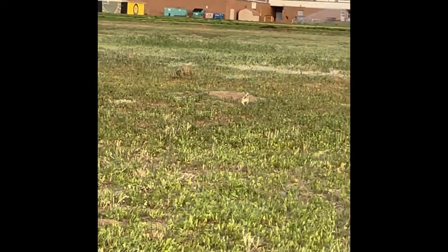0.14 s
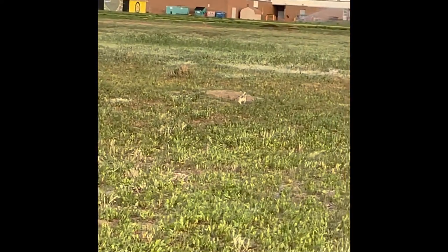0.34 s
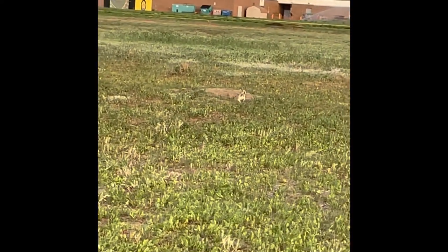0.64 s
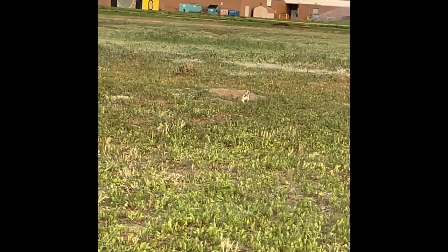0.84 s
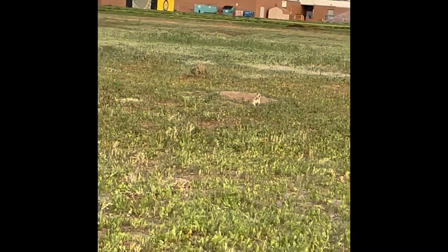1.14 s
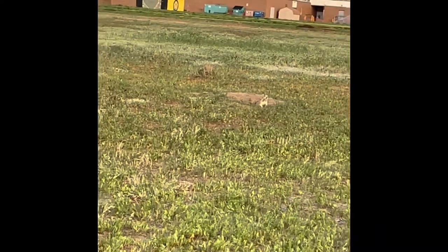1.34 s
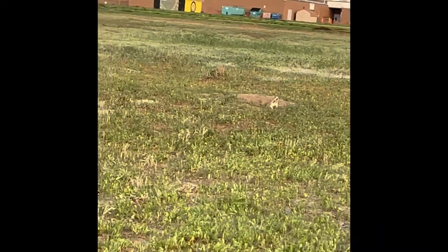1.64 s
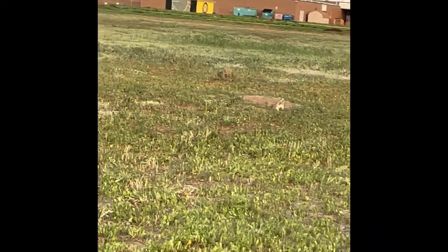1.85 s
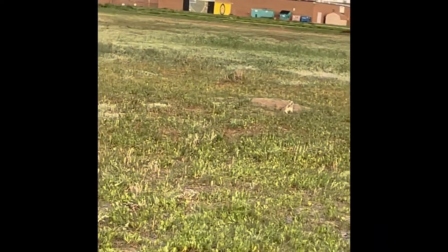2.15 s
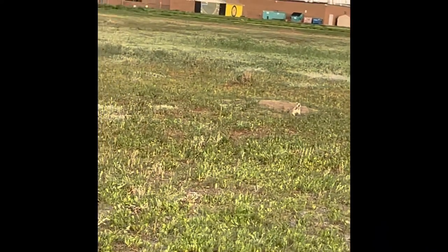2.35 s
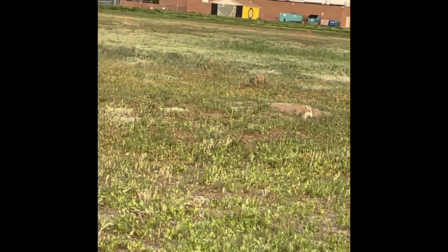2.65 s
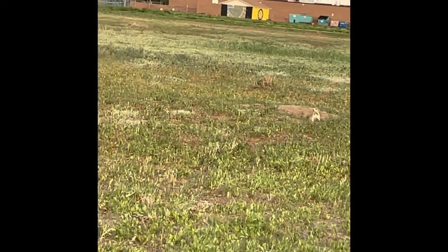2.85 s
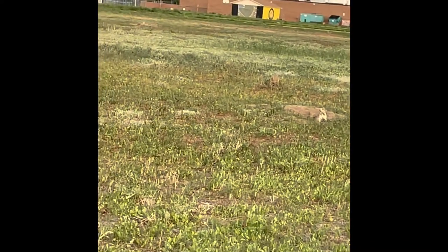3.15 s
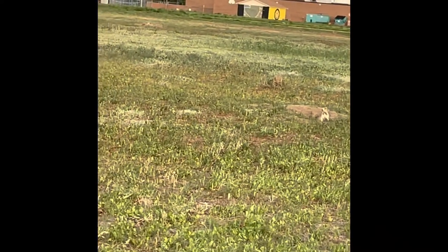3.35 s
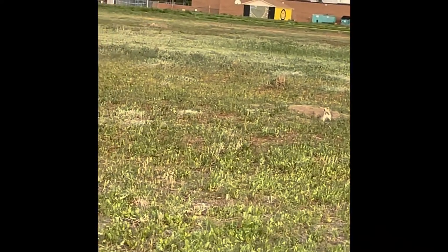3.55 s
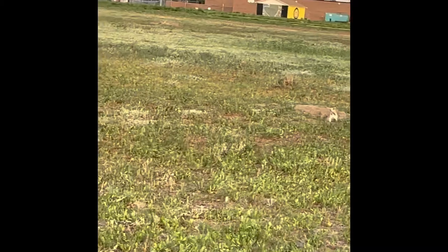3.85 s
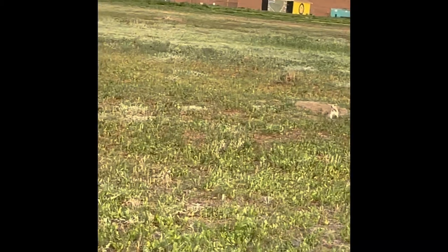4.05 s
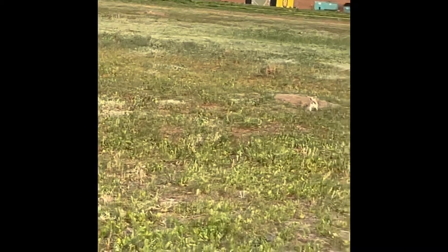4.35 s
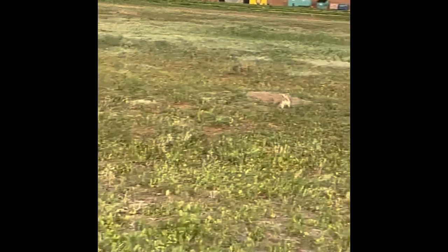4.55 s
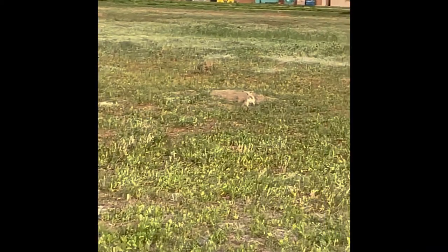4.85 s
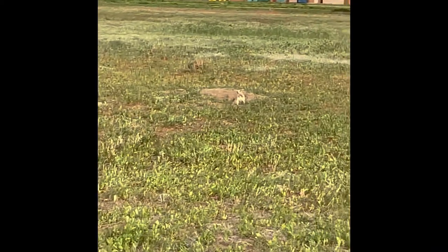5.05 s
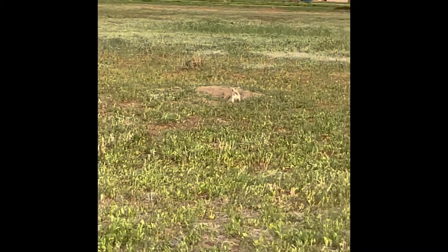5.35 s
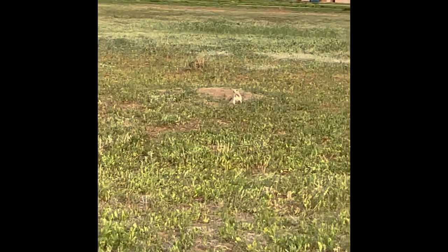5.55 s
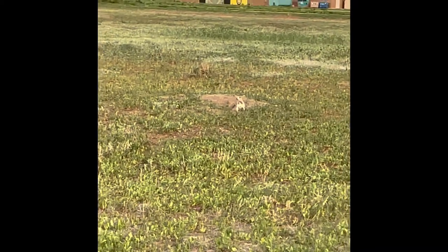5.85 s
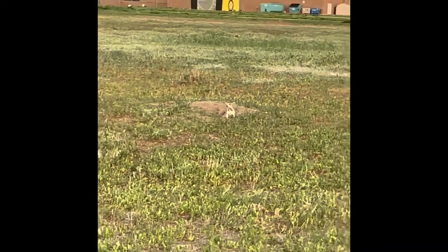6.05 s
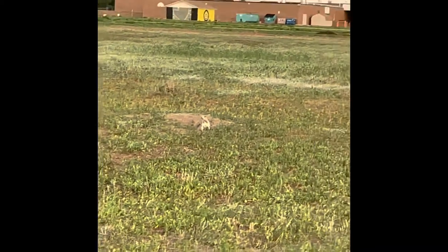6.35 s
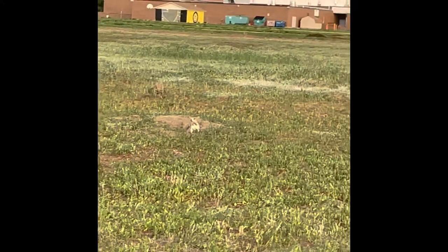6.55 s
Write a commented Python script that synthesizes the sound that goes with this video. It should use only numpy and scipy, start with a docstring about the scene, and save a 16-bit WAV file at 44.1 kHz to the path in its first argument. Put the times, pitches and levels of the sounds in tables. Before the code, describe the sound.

For about 6.7 seconds, a prairie dog colony gives alarm calls in an open field. From 0.07 s the nearest animal makes a hard, rough yip every half second or so, each under a tenth of a second and sagging into a weak, sputtering creak; these creaks sink lower after 5.2 s. A second animal barks from 0.2 s, about every third of a second, short and slightly harsh. Between them come clear arched chirps, the highest around 1.0, 1.35 and 1.7 s, fraying or cracking downward, plus faint distant rasps. Calls continue to the end with only a thin open-air echo. Behind are low rumble, distant traffic and a machine hum strongest near 0.7 s, with a faint warbling whine mostly later. Close to the microphone, dry rustling flickers, ticks cluster around 2-2.7 and 4.2 s, and soft bumps fall between 1.2 and 2 s.

```python
"""Prairie dogs give alarm calls across an open field: the nearest yips and trails off in a low creak,
a second barks, others chirp in arches that crack when pushed too high, and far ones rasp.
Every call is a stack of harmonics on a curved pitch, roughened by random slips of phase and level.
Distant traffic and machinery drone behind them as shaped noise, a wavering hum and a faint whine;
close to the microphone, flickering noise rustles and ticks, and a few short tones bump softly."""
import sys
import numpy as np
from scipy import signal
from scipy.fft import rfft, irfft, next_fast_len
from scipy.io import wavfile
from scipy.ndimage import map_coordinates

SR = 44100
rng = np.random.default_rng(int(sys.argv[2]) if len(sys.argv) > 2 else 0)


def transcribe(u):
    """Save the signal u as a 16-bit wav file named by the first command-line argument.

    u: samples, shape (n,) or (channels, n), limited to [-1, 1]; the rate is SR.
    q: integer samples, one column per channel.
    """
    v = np.clip(np.atleast_2d(u).T, -1, 1)
    q = np.round(v * 32767).astype(np.int16)
    wavfile.write(sys.argv[1], SR, q)


N = 295470


def amp(db):
    """Decibels to a linear factor."""
    return 10 ** (np.asarray(db) / 20)


def unit(x):
    """Scale to an rms of 1."""
    return x / np.sqrt(np.mean(x ** 2) + 1e-20)


def along(points, hz):
    """Read a curve of (Hz, value) points on a log frequency axis."""
    f, v = np.transpose(points)
    return np.interp(np.log(hz + 1), np.log(f + 1), v)


def level_curve(rows):
    """Draw straight lines through (seconds, dB) points, one value per sample."""
    s, db = np.transpose(rows)
    return np.interp(np.arange(N) / SR, s, db)


def wobble(rate, t):
    """A smooth random curve over the times t, rate knots a second."""
    return map_coordinates(rng.standard_normal(size=512), [t * rate], mode="wrap")


def filtered(x, response):
    """Multiply the spectrum of x by a complex response of frequency."""
    m = next_fast_len(N + SR // 2)  # padded, so that tails do not wrap round
    hz = np.fft.rfftfreq(m, 1 / SR)
    return irfft(rfft(x, m) * response(hz), m)[..., :N]


def noise(spectrum):
    """Coloured noise of rms 1."""
    return unit(filtered(rng.standard_normal(N), lambda hz: amp(along(spectrum, hz))))


# How alike left and right are in noise from all round. Each row: frequency in Hz, correlation from 0 to 1.
STEREO_LIKENESS = [(30, .93), (70, 1), (140, 0.52), (300, 0.62), (600, 0.85), (1200, 0.5), (3000, 1)]


def wide_noise(spectrum):
    """Stereo noise from all round: independent mid and side noises set how alike the two sides are."""
    turn = lambda hz: np.arccos(np.clip(along(STEREO_LIKENESS, hz), -1, 1)) / 2
    mid = filtered(noise(spectrum), lambda hz: np.cos(turn(hz)))
    side = filtered(noise(spectrum), lambda hz: np.sin(turn(hz)))
    return np.array([mid + side, mid - side])


def add(track, s, sound):
    """Mix a sound into the track at s seconds."""
    part = track[max(round(s * SR), 0):][:len(sound)]
    part += sound[:len(part)]


def clock(length):
    """Sample times of one short sound, in seconds."""
    return np.arange(max(round(length * SR), 2)) / SR


def arch(t, start_hz, top_hz, end_hz, place):
    """Pitch bends from start to top and on to its end along two half parabolas that meet level."""
    u = t / t[-1]
    place = np.clip(place, .05, .95)  # share of the call before the top
    before = top_hz + (start_hz - top_hz) * (1 - u / place) ** 2
    after = top_hz + (end_hz - top_hz) * ((u - place) / (1 - place)) ** 2
    return np.where(u < place, before, after)


def gate(t, attack, release):
    """A call starts and stops within milliseconds, along quarter sines."""
    opening = np.sin(np.pi / 2 * np.clip(t / attack, 0, 1))
    closing = np.sin(np.pi / 2 * np.clip((t[-1] - t) / release, 0, 1))
    return opening * closing


def fade(t, fall_db):
    """A call weakens steadily as its pressure runs out."""
    return amp(fall_db * (1.0 - t / t[-1]))


def step(t, when, width):
    """Go smoothly from 0 to 1 around a moment."""
    return .5 + .5 * np.tanh((t - when) / width)


def strain(pitch, limit_hz):
    """The voice breaks up when pushed above its limit: 0 well below it, 1 well above."""
    return .5 + .5 * np.tanh((pitch - limit_hz) / 70)


def voice(t, pitch, harmonics_db, bright_db, rough, jitter=0.057, scatter=0.6, chaos_rate=1700):
    """Vocal folds: harmonics whose cycles come early or late when rough, smearing sound between the lines."""
    phase = 2 * np.pi * np.cumsum(pitch * (1 + jitter * rough * wobble(746, t))) / SR
    flutter_db = 1.8 * np.tanh(3 * rough * wobble(650, t))  # shared by all harmonics
    out = np.zeros(len(t))
    for k, db in enumerate(harmonics_db, 1):
        slip = scatter * rough * k * wobble(chaos_rate, t)  # overtones smear more than the low lines
        shimmer_db = flutter_db + 2 * rough * wobble(900, t) + .6 * min(k, 4) * wobble(130, t)
        level = amp(db + bright_db * (k > 2) + shimmer_db)  # brightness acts from the third harmonic up
        out += level * np.sin(k * phase + slip + rng.uniform(0, 2 * np.pi))
    return out


def catch(t, place, width, depth):
    """The folds stall for a moment part way through a call, some calls more than others."""
    when = t[-1] * (place + .07 * rng.standard_normal())
    stall = np.clip(depth * rng.uniform(.4, 1.2), 0, 1)
    return 1 - stall * np.exp(-((t - when) / width) ** 2)


def field_echo(x, t60, level_db):
    """Ground and far walls scatter back a thin tail: noise that dies by 60 dB in t60 seconds."""
    t = clock(1.0)
    tail = rng.standard_normal(len(t)) * amp(-60 * t / t60) * (1 - np.exp(-t / 0.005))
    return amp(level_db) * signal.fftconvolve(x, tail / np.linalg.norm(tail))[:N]


# Colours of the town's three noises. Each row: frequency in Hz, relative density in dB per Hz.
RUMBLE_COLOUR = [(12, -45.5), (20, -35.5), (49, -0.5), (102, 5), (156, -7), (206, -18), (230, -33),
                 (300, -49.5), (510, -120)]
DRONE_COLOUR = [(120, -37), (200, -2), (350, -3), (550, -36)]
TRAFFIC_COLOUR = [(250, -13), (450, 0.5), (650, 1.5), (1000, -2), (1400, -5), (2200, -12), (3300, -18.5),
                  (4300, -50), (5500, -24), (8000, -55.5), (12000, -75.5)]
# How loud each part of the town is over time. Each row: time in seconds, relative level in dB.
RUMBLE_LEVEL = [(0, -49.5), (.7, -52.5), (1.2, -57), (1.8, -53), (2.4, -52), (3.7, -53), (4.15, -57),
                (5.8, -53.5), (6.7, -53.5)]
DRONE_LEVEL = [(0.0, -62), (0.22, -69.5), (0.71, -66), (3.82, -72.5), (4.16, -95.5), (4.48, -68.5),
               (5.73, -72), (5.75, -79.5), (5.95, -65.5), (6.7, -70.5)]
TRAFFIC_LEVEL = [(0, -58.5), (.7, -56.5), (1.2, -60.5), (1.8, -59.5), (3.1, -61.5), (4.15, -63),
                 (4.5, -59.5), (5.7, -60), (6.7, -59.5)]
HUM_LEVEL = [(0, -81), (.7, -52.5), (2.2, -58.5), (2.9, -71), (6.7, -67.5)]
# The town's direction. Each row: frequency in Hz, left minus right in dB.
TOWN_LEAN = [(30, 2.5), (90, 1.5), (170, 1), (350, .4), (650, -1.3), (1300, -1)]


def town(traffic_db=1.5, hum_hz=153, hum_db=-2, swell_db=1.2):
    """A rumble, a low drone, a wavering machine hum, and far traffic whose roar and hiss swell separately."""
    t = np.arange(N) / SR
    rumble = amp(level_curve(RUMBLE_LEVEL)) * wide_noise(RUMBLE_COLOUR)
    drone = amp(level_curve(DRONE_LEVEL)) * wide_noise(DRONE_COLOUR)
    traffic = wide_noise(TRAFFIC_COLOUR)
    roar = filtered(traffic, lambda hz: 1 / (1 + (hz / 800) ** 4))
    hiss = traffic - roar
    swelling = roar * amp(swell_db * wobble(7, t)) + hiss * amp(swell_db * wobble(7, t))
    road = amp(level_curve(TRAFFIC_LEVEL) + traffic_db) * swelling
    hum = amp(level_curve(HUM_LEVEL) + hum_db) * np.sin(2 * np.pi * hum_hz * t + 0.32 * wobble(14.0, t))
    lean = lambda hz: amp(np.outer([.5, -.5], along(TOWN_LEAN, hz)))
    return filtered(rumble + drone + road + hum, lean)


def whine(hz=1100, level_db=-64, loudest=5.0, spread=2.6):
    """A faint, far whine of unsteady pitch warbles in and out of hearing, most around loudest (s)."""
    t = np.arange(N) / SR
    phase = 2 * np.pi * np.cumsum(hz * (1 + .11 * wobble(11, t))) / SR + .9 * wobble(150, t)
    heard = np.clip(wobble(9, t) + .2, 0, 1.5)
    return amp(level_db) * heard * np.exp(-((t - loudest) / spread) ** 2) * np.sin(phase)


# Soft bumps. Each row: start in seconds, pitch in Hz, length in seconds, relative level in dB.
BUMPS = [(1.216, 392, 0.04, -53), (1.57, 1100, 0.012, -49.5), (1.617, 1010, 0.0088, -46),
         (1.647, 1134, 0.023, -52), (1.945, 302, 0.046, -54)]


def bumps():
    """A few dull, faint bumps: short tones of unsteady phase that swell and die."""
    out = np.zeros(N)
    for s, hz, length, db in BUMPS:
        t = clock(length)
        tone = np.sin(2 * np.pi * hz * t + 1.8 * wobble(hz / 2, t))
        add(out, s, amp(db + 3) * np.sin(np.pi * t / t[-1]) * tone)
    return out


# How loud the rustle is over time. Each row: time in seconds, relative level in dB.
RUSTLE_LEVEL = [(0.0, -86), (0.47, -91), (0.76, -76.5), (1.29, -85.5), (2.35, -86), (2.5, -80),
                (2.85, -87.5), (3.73, -83.5), (4.59, -82.5), (4.78, -88), (5.28, -77.5), (5.5, -85.5),
                (5.91, -88.5), (6.1, -86), (6.27, -104), (6.7, -105)]
# Dry ticks. Each row: time in seconds, relative level in dB.
TICKS = [(0.54, -55), (0.863, -59.5), (2.036, -54), (2.061, -49.5), (2.234, -61), (2.523, -57),
         (2.676, -55), (2.721, -52.5), (3.181, -57), (3.633, -58.5), (3.902, -57), (4.163, -55),
         (4.176, -51.5), (5.037, -49.5), (5.143, -61), (5.98, -53)]
# Colours of the rustle and of the ticks. Each row: frequency in Hz, relative density in dB per Hz.
RUSTLE_COLOUR = [(1000, -27.5), (2500, 5), (3600, -4.5), (4500, -2.5), (5700, -3.5), (8500, 5.5),
                 (12000, -20.5), (13500, -8), (15500, -20)]
TICK_COLOUR = [(1000, -26), (4500, -21), (6000, 1), (8000, 1), (11500, -10), (13500, -4.5), (16000, -29.5)]


def rustle(level_db=16, tick_db=4, flicker_db=3):
    """A dry rustle of flickering noise with ticks of fast-dying noise, close to the microphone."""
    t = np.arange(N) / SR
    bed_db = level_curve(RUSTLE_LEVEL) + level_db + flicker_db * wobble(70, t) + 0.79 * wobble(5.7, t)
    bed = amp(bed_db) * noise(RUSTLE_COLOUR)
    bursts, life = np.zeros(N), clock(.02)
    for s, db in TICKS:
        add(bursts, s - .0007, amp(db + tick_db - 60 * life / 0.018))
    return bed + bursts * noise(TICK_COLOUR)


# Voice of the chirpers and of the rest of the colony. Listed: level in dB of harmonics 1, 2, 3 ..
CHIRP_HARMONICS = [-13, -2, -5, -17.5, -11, -15.5]


def colony(count=60, level_db=-73, spread_db=10):
    """The rest of the colony, barely audible across the field: rough, dull calls at random times."""
    out = np.zeros(N)
    for when, size, height, loud in rng.random((count, 4)):
        t = clock(0.028 + 0.017 * size)
        top_hz = 1680 + 250 * height
        pitch = arch(t, .9 * top_hz, top_hz, .85 * top_hz, place=.4)
        call = voice(t, pitch, CHIRP_HARMONICS, bright_db=-18, rough=.9)
        add(out, when * N / SR, amp(level_db + spread_db * loud) * call * gate(t, attack=.01, release=0.0079))
    return out


# Far animals. Each row: start in seconds, nominal length in seconds, top pitch in Hz, relative level in dB.
RASPS = [(0.036, 0.043, 1677, -57.5), (0.369, 0.048, 1703, -57.5), (0.799, 0.04, 1782, -56),
         (1.22, 0.034, 1730, -56), (1.59, 0.048, 1735, -60), (1.875, 0.051, 1650, -66.5),
         (2.072, 0.047, 1807, -55.5), (2.587, 0.042, 1650, -61), (2.927, 0.036, 1755, -57.5),
         (4.106, 0.041, 1722, -55.5), (4.432, 0.091, 1740, -59), (4.617, 0.044, 1690, -59),
         (5.797, 0.038, 1725, -58), (6.17, 0.066, 1670, -58.5), (6.644, 0.032, 1595, -67)]
# Their voice. Listed: level in dB of harmonics 1, 2, 3 ..
RASP_HARMONICS = [-1.5, 5.5, 5, -8.5, -8.5]


def rasps(throb_hz=330, throb=0.64):
    """Far calls, chopped by a slower second vibration in the throat."""
    out = np.zeros(N)
    for s, length, top_hz, db in RASPS:
        t = clock(length + 0.0042)
        pitch = arch(t, .93 * top_hz, top_hz, .86 * top_hz, place=.3)
        chop = 1 + throb * np.sin(2 * np.pi * throb_hz * t + 1.3 * wobble(130, t))
        rasp = voice(t, pitch, RASP_HARMONICS, bright_db=-2.5, rough=.37) * chop
        add(out, s, amp(db) * rasp * fade(t, fall_db=2.5) * gate(t, attack=0.0045, release=0.01))
    return out


# Clear-voiced animals. Each row: start in seconds, nominal length in seconds, aimed top pitch in Hz,
# relative level in dB, brightness in dB.
CHIRPS = [(0.195, 0.044, 2084, -53.5, -8), (0.595, 0.033, 1800, -45.5, -4.5),
          (0.692, 0.029, 1745, -55, -26), (0.732, 0.056, 2010, -53, -6.5), (0.962, 0.066, 2440, -45, -13),
          (1.055, 0.041, 1720, -57, -19), (1.16, 0.04, 1670, -51, -32), (1.349, 0.063, 2323, -42, -12),
          (1.431, 0.065, 1897, -54, -10.5), (1.731, 0.056, 2220, -42.5, -13), (2.118, 0.055, 2010, -58, -3),
          (2.39, 0.062, 2220, -44, -11), (3.014, 0.074, 1950, -61, 1), (3.021, 0.032, 1696, -49, -19),
          (3.253, 0.062, 2220, -44, -8), (3.615, 0.011, 1720, -52.5, -14), (3.768, 0.059, 1980, -43, -12.5),
          (3.912, 0.02, 1750, -51.5, -6), (4.213, 0.024, 1685, -57.5, -16), (4.247, 0.053, 2027, -45, -10),
          (4.392, 0.039, 1890, -56, -1), (4.74, 0.041, 1907, -44, -14), (4.819, 0.025, 1765, -60.5, -19),
          (5.098, 0.02, 1685, -55, -27), (5.187, 0.025, 1540, -56, -10), (5.276, 0.054, 1834, -45, -5),
          (5.609, 0.054, 2004, -58, -5.5), (5.676, 0.079, 1790, -54, -1), (5.818, 0.051, 2025, -44, -10.5),
          (6.21, 0.048, 1690, -61, -27), (6.282, 0.043, 1855, -44, -14.5), (6.604, 0.017, 1720, -53.5, -26)]
CHIRP_REST_HZ, CHIRP_END_HZ = 1590, 1515  # pitch that the rise is reckoned from; pitch aimed at by the end
CHIRP_HEAD_START = .25  # share of the rise that is over before the voice sets in
CHIRP_TOP_AT = 0.27  # share of the call before the top
# A chirp above CRACK_HZ cracks this long after its top and resumes lower.
CRACK_HZ, CRACK_LAG_S, REGAIN_HZ = 2260, 0.0051, 1854


def chirps():
    """Whistled arches that fray past the top when high; the highest crack and finish in a lower register."""
    out = np.zeros(N)
    for s, length, top_hz, db, bright_db in CHIRPS:
        t = clock(length + 0.0011)
        start_hz = CHIRP_REST_HZ + CHIRP_HEAD_START * (top_hz - CHIRP_REST_HZ)
        aim = arch(t, start_hz, top_hz, CHIRP_END_HZ, CHIRP_TOP_AT)
        top_s = CHIRP_TOP_AT * length
        cracked = strain(top_hz, CRACK_HZ) * step(t, top_s + CRACK_LAG_S, width=0.0044)
        pitch = aim - cracked * np.maximum(aim - REGAIN_HZ, 0)
        rough = .26 + .55 * strain(aim, limit_hz=2080) * step(t, top_s, width=.004)
        chirp = voice(t, pitch, CHIRP_HARMONICS, bright_db, rough)
        add(out, s, amp(db) * chirp * fade(t, fall_db=4.5) * gate(t, attack=0.0033, release=0.0019))
    return out


# Second animal. Each row: start in seconds, nominal length in seconds, top pitch in Hz before the step down,
# relative level in dB, brightness in dB.
BARKS = [(0.222, 0.045, 1973, -44.5, -6.5), (0.549, 0.042, 1946, -44, -6), (0.913, 0.036, 1882, -43, -8.5),
         (1.302, 0.037, 1895, -43.5, -8), (1.632, 0.034, 1853, -44.5, -3.5),
         (1.942, 0.036, 1868, -44.5, -7), (2.287, 0.037, 1910, -44, -7.5),
         (2.634, 0.035, 1860, -43.5, -8.5), (2.988, 0.038, 1896, -42, -7), (3.3, 0.04, 1867, -42.5, -9),
         (3.701, 0.042, 1970, -43, -6), (4.018, 0.037, 1914, -42, -7.5), (4.352, 0.036, 1875, -43, -6.5),
         (4.705, 0.043, 1940, -43, -9), (4.997, 0.033, 1895, -43, -8.5), (5.332, 0.054, 1933, -44, -7.5),
         (5.72, 0.046, 1862, -44, -5), (5.995, 0.045, 1983, -46, -4.5), (6.481, 0.034, 1852, -46.5, -5.5)]
# Its voice. Listed: level in dB of harmonics 1, 2, 3 ..
BARK_HARMONICS = [-2.5, 3.5, 3.5, -5, -3, -31.5, -6.5]
BARK_STEP = 0.028  # share by which the pitch steps down halfway through


def barks():
    """A short arch, harsher the higher it gets; halfway through it steps down and comes out cleaner."""
    out = np.zeros(N)
    for s, length, top_hz, db, bright_db in BARKS:
        t = clock(length + 0.0015)
        pitch = arch(t, .88 * top_hz, top_hz, .83 * top_hz, place=.24)
        pitch = pitch * (1 - BARK_STEP * step(t, length / 2, width=0.0016))
        rough = .25 + .5 * strain(pitch, limit_hz=1870)
        bark = voice(t, pitch, BARK_HARMONICS, bright_db, rough)
        bark = bark * catch(t, place=0.43, width=0.00079, depth=1.0)
        add(out, s, amp(db) * bark * fade(t, fall_db=3.5) * gate(t, attack=0.0052, release=0.012))
    return out


# Nearest animal. Each row: start in seconds, nominal length of the yip in seconds, top pitch of the yip in Hz,
# central pitch of the creak in Hz, relative level in dB, brightness of the yip in dB.
YIPS = [(0.066, 0.012, 1880, 1380, -40, -1), (0.62, 0.015, 1882, 1424, -38.5, 0),
        (1.117, 0.015, 1792, 1420, -38, 1.5), (1.64, 0.012, 1787, 1422, -39, -2),
        (2.327, 0.012, 1877, 1427, -38, -1.5), (2.835, 0.021, 1795, 1407, -39, -1.5),
        (3.469, 0.014, 1853, 1398, -38, -1), (3.938, 0.016, 1844, 1360, -38.5, -1.5),
        (4.461, 0.014, 1782, 1335, -38, 0.5), (4.947, 0.015, 1786, 1355, -37, -2),
        (5.241, 0.019, 1826, 1248, -37.5, -3), (5.696, 0.017, 1830, 1272, -36, -3),
        (6.102, 0.015, 1913, 1330, -38.5, -1.5), (6.504, 0.016, 1762, 1260, -36.5, -3)]
# Its two registers. Listed: level in dB of harmonics 1, 2, 3 ..
YIP_HARMONICS = [-1.5, 4.5, 6, -5.5, -8, -17.5, -16.5]
CREAK_HARMONICS = [1, 6.5, 7, 1.5, -17, -15, -19.5]
YIP_PLUS_CREAK_S = 0.061  # the longer the yip, the shorter its creak
# A creak is weaker than its yip, and the more so the lower it sinks.
CREAK_REF_HZ, CREAK_UNDER_DB, CREAK_DB_PER_HZ = 1364, -17, 0.0487


def yips():
    """A hard, rough yip, after which the voice drops to a weak, sputtering lower register."""
    out = np.zeros(N)
    for s, length, top_hz, creak_hz, db, bright_db in YIPS:
        t = clock(length + 0.00038)
        pitch = arch(t, 0.912 * top_hz, top_hz, 0.895 * top_hz, place=0.3)
        rough = 0.6 * np.clip(t / 0.0057, .3, 1)
        yip = voice(t, pitch, YIP_HARMONICS, bright_db, rough)
        yip = yip * catch(t, place=.66, width=.0008, depth=.75)
        add(out, s, amp(db) * yip * gate(t, attack=0.0032, release=0.0026))

        t = clock(YIP_PLUS_CREAK_S - length)
        pitch = arch(t, 1.08 * creak_hz, creak_hz, .91 * creak_hz, place=.55) * (1 + .012 * wobble(120, t))
        sputter = 1 + 0.61 * np.tanh(1.0 * wobble(420, t))
        creak = voice(t, pitch, CREAK_HARMONICS, bright_db=0, rough=.32 + .5 * np.exp(-t / .009))
        creak_db = db + CREAK_UNDER_DB + CREAK_DB_PER_HZ * (creak_hz - CREAK_REF_HZ)
        creak = amp(creak_db) * creak * sputter * gate(t, attack=0.0013, release=0.013)
        add(out, s + length - .001, creak)  # overlaps the end of the yip
    return out


# Tone that the mouth gives every call. Each row: frequency in Hz, gain in dB.
MOUTH_TONE = [(1900, -2.5), (2300, 3.5), (2900, 2.5), (3600, 4), (4450, -2.5), (5500, 2), (6300, 7.5),
              (7200, 6.5), (8300, -4), (12500, -19.5), (14500, -31.5)]


def scene():
    """Far callers and the colony get extra scatter from the ground; all calls share one long, faint echo."""
    far = chirps() + rasps()
    scattered = field_echo(far, t60=0.056, level_db=-13.0) + field_echo(colony(), t60=0.13, level_db=5.5)
    calls = filtered(yips() + barks() + far + scattered, lambda hz: amp(along(MOUTH_TONE, hz)))
    echo = field_echo(calls, t60=1.0, level_db=-25.5)
    return town() + whine() + bumps() + rustle() + calls + echo


# The two microphone ports. Each row: frequency in Hz, phase by which left leads right in radians.
PORT_LEAD = [(300, 0), (1500, -.05), (2200, .25), (2700, .82), (3500, .42), (4300, .08), (4950, .2),
             (5500, 1.05), (6200, 1.5), (7200, 1.95), (8000, 2.4), (9000, 2.7), (11000, 2.8)]
TOP_HZ = 15850  # band limit


def record(dry):
    """The two ports hear the treble out of step; nothing is kept above the band limit."""
    lead = lambda hz: np.exp(.5j * np.outer([1, -1], along(PORT_LEAD, hz)))
    return filtered(dry, lambda hz: lead(hz) * (hz < TOP_HZ))


dry = scene()
out = record(dry)
transcribe(out)
```